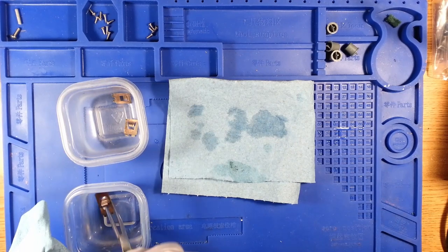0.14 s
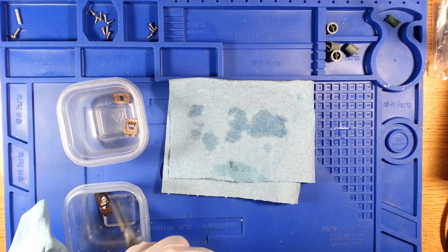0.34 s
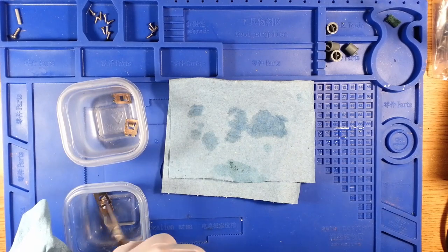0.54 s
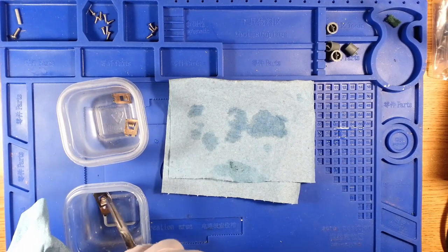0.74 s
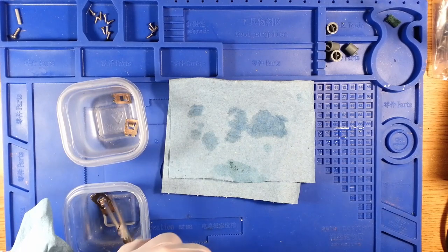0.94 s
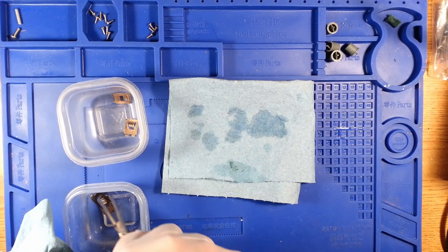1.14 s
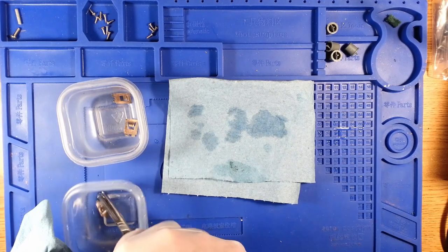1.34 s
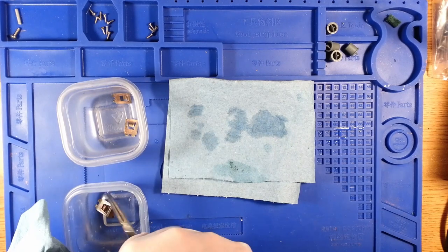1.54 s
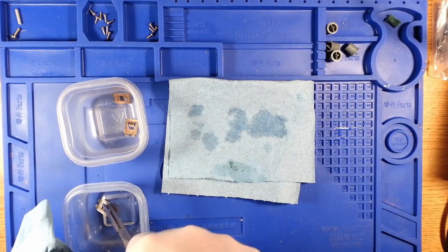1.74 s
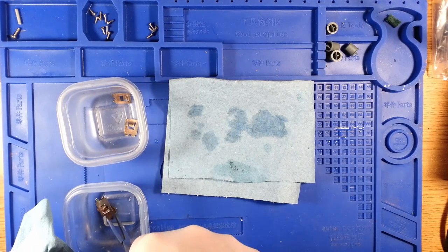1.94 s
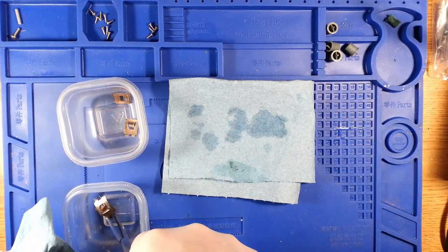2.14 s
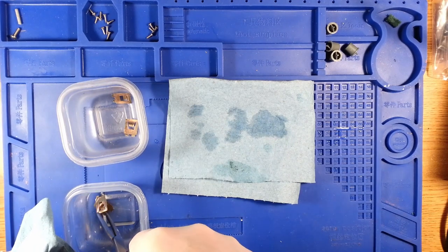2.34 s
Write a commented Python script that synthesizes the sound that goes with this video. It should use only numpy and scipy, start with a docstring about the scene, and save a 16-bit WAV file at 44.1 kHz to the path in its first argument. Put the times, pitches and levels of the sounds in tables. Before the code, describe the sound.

Metal tweezers click against small metal parts in a plastic tub on a workbench. A loud, rapid clatter with a short scrape comes at 0.24-0.3 s, a few clinks at 0.7-0.77, soft scraping ticks around 1.0-1.1, then a busy rattle at 1.3-1.57 with one sharp snap near 1.37. Faint taps follow at 1.9 and 2.2-2.4. Close stereo, small room, steady quiet fan hum.

```python
"""Over a soft, steady room hum, sharp little clicks and short scrapes come from a plastic tub.
Steel tweezers pick at small metal terminals in the tub, which stands on a workbench.
Each contact is a burst of noise that cracks and rings the metal, the tub and the tweezer tips.
Scrapes are made of many tiny random slips. The tub walls, bench and small room scatter the sound.
A close stereo microphone hears it all; fading sine waves make the rings and noise makes the air."""
import sys
import numpy as np
from scipy import signal
from scipy.fft import rfft, irfft
from scipy.io import wavfile
from scipy.ndimage import uniform_filter1d

SR = 44100
rng = np.random.default_rng(int(sys.argv[2]) if len(sys.argv) > 2 else 0)


def put_to_file(sound):
    """Save the sound as 16-bit audio at rate SR, in the file named by the first command-line argument."""
    columns = np.atleast_2d(sound).T  # one column per channel
    safe = np.clip(columns, -1, 1)
    whole_steps = np.round(safe * 32767)
    wavfile.write(sys.argv[1], SR, whole_steps.astype(np.int16))


N = 110250  # samples in the scene
RING_S = .14  # length of every ring [s]


def amp(db):
    """Turn decibels into a plain multiplier."""
    return 10 ** (np.asarray(db) / 20)


def unit(x):
    """Scale to an energy of one."""
    return x / np.sqrt(np.sum(x ** 2, axis=-1, keepdims=True))


def curve(points):
    """Join (frequency [Hz], value) points into one value for every frequency bin."""
    hz, value = np.array(points, float).T
    bin_hz = np.arange(N // 2 + 1) * SR / N
    return np.interp(np.log(bin_hz + 1), np.log(hz), value)


def fade(t60):
    """Half a second of exponential decay that falls 60 dB in t60 seconds."""
    return np.exp(-np.log(1000) * np.arange(SR // 2) / SR / t60)


def filtered(x, order, hz, kind="low"):
    """Keep the frequencies below, above or between the given limits [Hz]."""
    return signal.sosfilt(signal.butter(order, hz, kind, fs=SR, output="sos"), x)


def walk(rate):
    """A smooth random curve, made by softening about `rate` random steps per second."""
    step = int(SR / rate)
    held = np.repeat(rng.standard_normal(200), step)[:N]
    return uniform_filter1d(uniform_filter1d(held, step), step)


def even(burst):
    """Roughly keep the timing of a random burst but even out its colour."""
    n = burst.shape[-1]
    for _ in range(3):
        spectrum = rfft(burst, 2 * n)
        burst = irfft(spectrum / (np.abs(spectrum) + 1e-9), 2 * n)[..., :n]
    return unit(burst)


def add(out, sound, start_s):
    """Mix a sound in at a time."""
    i = int(start_s * SR)
    out[:, i:i + sound.shape[1]] += sound[:, :N - i]


def room_air():
    """Soft air noise: the two sides share more of the sound at some frequencies than at others."""
    # colour of the air: (frequency [Hz], relative level per Hz [dB])
    colour = [(25, -15), (50, -12.5), (80, -2.5), (120, 6), (160, 2), (230, 3), (400, -4.5), (550, -3.5),
              (800, -8), (1600, -14.5), (3200, -17.5), (6000, -22.5), (10000, -21), (14500, -22.5)]
    # how alike left and right are: (frequency [Hz], correlation [-1 to 1])
    likeness = [(40, 0.57), (120, 0.82), (300, 0.46), (1000, 0), (3000, 0), (14000, 0.0048)]
    level_db = -55
    alike = curve(likeness)
    shares = np.sqrt([1 + alike, 1 - alike])
    noise = rfft(rng.standard_normal((2, N)))
    mid, side = irfft(noise * amp(curve(colour)) * shares, N)
    return np.array([mid + side, mid - side]) / mid.std() * amp(level_db)


def fan_hum():
    """A fan hums in steady tones whose loudness and phase waver a little."""
    # hum tones: (frequency [Hz], level before the waver [dB], size of the random phase wobble [rad])
    tones = [(118.7, -64, 0.32), (237, -64, 1), (307.5, -65.5, 0.52), (627.6, -69, 0.8), (928, -71, .45),
             (1140, -79, .45)]
    waver_db = -0.75  # scales the random loudness curve
    t = np.arange(N) / SR
    hum = np.zeros(N)
    for hz, db, wobble in tones:
        loudness = np.sqrt(2) * amp(db + waver_db * walk(7.9))
        hum += loudness * np.sin(2 * np.pi * hz * t + wobble * walk(12))
    return hum


def crack():
    """A hard contact makes a short click that starts at once and has its own colour."""
    # colour of the crack: (frequency [Hz], relative level [dB])
    colour = [(100, -11), (300, -6.5), (800, -10.5), (1600, -3.5), (2400, -1), (2950, 6.5), (3600, 6),
              (4600, 5), (7000, -2.5), (9000, -3.5), (11500, -6), (14500, -9.5)]
    # Folding the cepstrum (spectrum of the log spectrum) puts the energy at the very start.
    cepstrum = irfft(np.log(amp(curve(colour))), N)
    cepstrum[1:N // 2] *= 2
    cepstrum[N // 2:] = 0
    return unit(irfft(np.exp(rfft(cepstrum)), N)[:SR // 100])


def ring(modes):
    """A struck body rings in fading tones (modes), a little different at every contact point."""
    scatter_db, detune = 1.5, .011  # random spread of mode level [dB] and of pitch [fraction]
    t = np.arange(int(RING_S * SR)) / SR
    hz, db, t60 = np.array(modes, float).T[:, :, None]
    size, shift = rng.standard_normal((2, len(modes), 1))
    tones = np.cos(2 * np.pi * hz * (1 + detune * shift) * t)
    waves = unit(tones * np.exp(-np.log(1000) * t / t60))
    sign = (-1) ** np.arange(len(modes))[:, None]
    return unit(np.sum(sign * amp(db + scatter_db * size) * waves, axis=0))


def bodies(rings_db, click):
    """The crack comes with the ring of the metal parts, the plastic tub and the tweezer tips."""
    # modes of each body before random spread: (frequency [Hz], relative level [dB], 60 dB fade time [s])
    metal_modes = [(1546, -18, 0.041), (1872, -13.5, .035), (2790, -21.5, .033), (3307, 0.5, 0.011),
                   (3463, -12, 0.0378), (4350, -7, 0.0074), (4340, -17, .08), (4530, -1.5, .0088),
                   (4780, -13, 0.046), (5190, -20, 0.033), (5650, -18, 0.049), (8460, -21, .05)]
    tub_modes = [(311, -19, 0.0087), (446, -3.5, 0.03), (748, -6, 0.018), (1009, 0, 0.02),
                 (1500, 0.5, 0.0076), (1876, 1, 0.036), (2433, 5, 0.0047), (5280, 9, 0.0047)]
    tip_modes = [(4534, 11.5, 0.013), (5174, -6.5, .012), (6080, -0.5, 0.0076), (6660, -12.5, 0.04),
                 (6880, -3.5, 0.012), (7350, -4.5, 0.053), (9940, -9.5, 0.011), (12070, -6, 0.066)]
    rings = amp(rings_db) @ np.array([ring(metal_modes), ring(tub_modes), ring(tip_modes)])
    return rings + np.pad(click, (0, len(rings) - len(click)))


def contact(force, body):
    """A force sounds the bodies; both sides hear it directly and scattered by tub walls and bench."""
    walls_db, walls_t60_s, walls_above_hz = 0, 0.017, 5250
    # The bench noise fades before evening, then again twice as slowly.
    bench_db, bench_fade_s, bench_delay_s = -5, 0.09, .002
    left_lag_s = .000136  # the direct sound reaches the left side later
    n = len(body)
    near, far = rng.standard_normal((2, 2, n))
    # The tub walls scatter the treble at once.
    walls = filtered(unit(near * fade(walls_t60_s)[:n]), 3, walls_above_hz, "high")
    bench = even(far * fade(bench_fade_s)[:n])
    bench = unit(bench * fade(2 * bench_fade_s)[:n])
    late_bench = np.pad(bench, ((0, 0), (int(bench_delay_s * SR), 0)))[:, :n]
    paths = amp(walls_db) * walls + amp(bench_db) * late_bench
    paths[0, round(left_lag_s * SR)] += 1
    paths[1, 0] += 1
    struck = signal.fftconvolve(force, body)
    return signal.fftconvolve(struck[None], paths, axes=1)


def taps(click):
    """Each blow is a brief chatter of contacts; the struck spot favours one mode of its own."""
    # blows: (time [s], crack level [dB], then against the crack: metal ring [dB], tub knock [dB],
    # tip ring [dB]; chatter length [s], struck spot's mode [Hz], its level against the crack [dB])
    blows = [(.003, -32, 3, -3.5, -23, .005, 1716, -6.5), (0.2376, -4.5, 7.5, -3, 13.5, 0.0014, 4540, -1),
             (0.2422, -2.5, 4.5, -23, 9, 0.0012, 6630, 1), (0.2512, 4.5, 3, -18, -4, .002, 5300, -23),
             (0.2569, -1.5, 6.5, -27, -2, 0.00054, 4500, -12),
             (0.2685, -3.5, -2.5, -21, -18, 0.00061, 3330, -3),
             (.2782, -17, 10, -22, -2, 0.00055, 4520, 9.5), (0.2933, -8, 3.5, -4.5, -8, 0.0011, 4750, 3),
             (.3, -8.5, 1, -6.5, -2, 0.0047, 4500, -12), (.6868, -6.5, 6.5, -2.5, 1.5, 0.0039, 3350, 3),
             (0.69, -5.5, -14, -5, -25.5, 0.0015, 1522, -10.5),
             (0.7258, -12.5, -4.5, -5.5, -11.5, .0006, 1414, -4.5),
             (.748, -26.5, -13, -18, -1, 0.00085, 5230, -1), (0.7705, -19, 5, 1, -2, 0.0004, 5970, 0.5),
             (0.9998, -16, 6.5, -2, 0, .0015, 4320, 1.5), (1.0056, -18, 1.5, -14.5, 5.5, 0.004, 3480, 2.5),
             (1.0112, -17.5, 1.5, 1, -16.5, 0.00062, 3336, 1),
             (1.043, -23.5, 0.5, 4.5, 4.5, 0.0044, 1900, -2.5), (1.067, -17.5, 4, 0, -14, 0.0033, 4500, -8),
             (1.074, -18, -16, -8, -5, 0.0014, 1890, -4), (1.114, -29.5, -4, -10.5, -18, .002, 4300, -6),
             (1.317, -15, 5, -15, -5, 0.0054, 4540, -7), (1.3272, -14, 7, 1.5, 1, .0015, 4400, -1.5),
             (1.3465, -21, -0.5, -17.5, 7, 0.0013, 7600, -6), (1.3675, 4, -3.5, -2, -3, 0.00016, 1059, -2),
             (1.37, -7.5, -9.5, 6.5, -18, 0.00051, 2294, 9), (1.418, -18.5, -5, -16, 3.5, .003, 5530, 3.5),
             (1.431, -18, 5, 3, -2, .002, 5140, -10), (1.44, -16, -7, -4, 6, 0.0035, 4410, 10),
             (1.4635, -19, -10, 3, 7.5, 0.0021, 4800, -3), (1.4699, -13, -5, -2, 2.5, 0.0023, 5000, -10),
             (1.481, -14.5, -8, -3, 5.5, 0.0026, 4700, -6),
             (1.501, -19.5, 13, -1.5, -6, 0.0015, 4520, 13.5), (1.5036, -12.5, -0.5, -1, 7, .0025, 4490, 8),
             (1.572, -27, 4.5, 7.5, -11, 0.0011, 1910, -5.5),
             (1.911, -22.5, 6.5, -20.5, 2, .002, 4590, 3.5), (1.939, -31, -2, -9.5, -14, 0.0038, 3340, 7.5),
             (2.199, -19.5, -1.5, -13, -19, 0.00095, 1905, -9),
             (2.279, -22.5, 1, -4.5, -23, 0.0035, 1900, -15),
             (2.307, -17, 1.5, -6, -22, 0.0012, 1830, -7.5),
             (2.3287, -25.5, 1, -16, -21, 0.0018, 1860, 1.5),
             (2.3962, -27.5, -15, -20, -4, 0.0062, 5770, -5)]
    chatter_fall_db, spot_t60_s = 13.5, 0.029
    out = np.zeros((2, N))
    t = np.arange(int(RING_S * SR)) / SR
    for start_s, db, metal, tub, tip, length_s, spot_hz, spot_db in blows:
        n = int(length_s * SR)
        chatter = rng.standard_normal(n) * amp(np.linspace(0, -chatter_fall_db, n))
        force = even(chatter)
        spot_wave = np.sin(2 * np.pi * spot_hz * t) * fade(spot_t60_s)[:len(t)]
        spot = amp(spot_db) * unit(spot_wave)
        body = bodies([metal, tub, tip], click) + spot
        add(out, amp(db) * contact(force, body), start_s)
    return out


def scrapes(click):
    """A dragged part sticks and lets go in irregular tiny slips."""
    # strokes: (start [s], length [s], starting force level [dB], growth over the stroke [dB])
    strokes = [(0.262, 0.052, -39, 4.5), (0.996, 0.077, -46.5, -2.5), (1.327, 0.045, -39, -0.5),
               (1.408, 0.074, -41.5, 11), (1.491, 0.036, -34.5, -9), (1.915, 0.063, -48.5, -9),
               (2.241, 0.078, -43.5, -17), (2.31, 0.059, -48.5, -10.5), (2.377, 0.019, -47, -4),
               (2.414, 0.06, -61, 7)]
    # ring levels against the crack: metal, tub, tip [dB]
    rings_db = (0.5, -8, -15)
    slips_per_s, slip_range_db = 2000, 19
    out = np.zeros((2, N))
    for start_s, length_s, db, growth_db in strokes:
        along = np.linspace(0, 1, int(length_s * SR))
        chance, size = rng.random((2, len(along)))
        slips = (chance < slips_per_s / SR) * amp(slip_range_db * size)
        soft_ends = np.minimum(1, 10 * np.minimum(along, 1 - along))
        pressure = amp(db + growth_db * along) * soft_ends
        force = pressure * slips / slips.std()
        add(out, contact(force, bodies(rings_db, click)), start_s)
    return out


def space(x):
    """Small parts give little bass; the room adds a tail; the left side is coloured differently."""
    # colour of the left against the right: (frequency [Hz], level [dB])
    left_colour = [(300, 5), (650, 2), (1800, -3.5), (4800, -2.5), (8000, 2), (14000, 0)]
    low_cut_hz = 287
    room_db, room_delay_s = -13.5, 0.01
    # Below the split the room rings longer and gets a boost.
    split_hz, bass_db, bass_t60_s, treble_t60_s = 555, 2.5, 0.6, 0.15
    x = filtered(x, 3, low_cut_hz, "high")
    noise = rng.standard_normal((2, SR // 2))
    low = filtered(noise, 2, split_hz)
    high = filtered(noise, 1, [split_hz, 13000], "band")
    tail = amp(bass_db) * low * fade(bass_t60_s) - high * fade(treble_t60_s)
    room = unit(tail * (np.arange(SR // 2) > room_delay_s * SR))
    echo = signal.fftconvolve(x, room, axes=1)[:, :N]
    wet = x + amp(room_db) * echo
    # Half of the colour goes to the left, the opposite half to the right.
    sides = amp(np.outer([.5, -.5], curve(left_colour)))
    return irfft(rfft(wet) * sides, N)


def scene():
    """Air and fan hum under the taps and scrapes in their room."""
    click = crack()
    return room_air() + fan_hum() + space(taps(click) + scrapes(click))


def record(dry):
    """The recorder steeply cuts the top, above 14500 Hz."""
    return signal.sosfilt(signal.ellip(8, .2, 70, 14500, fs=SR, output="sos"), dry)


dry = scene()
out = record(dry)
put_to_file(out)
```